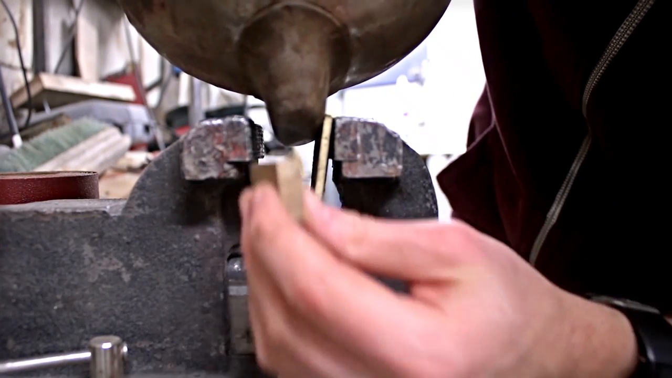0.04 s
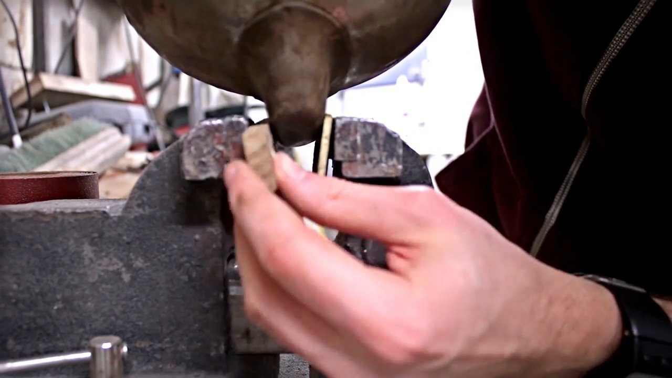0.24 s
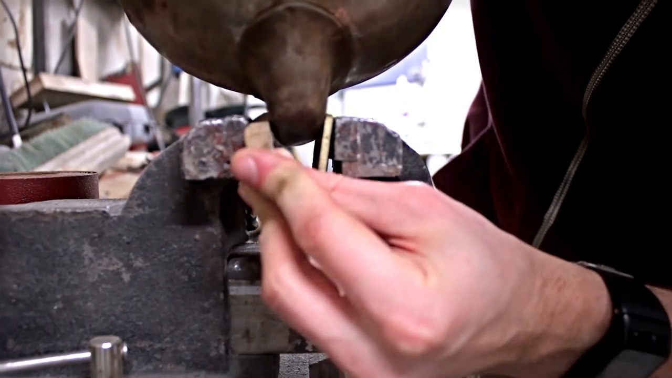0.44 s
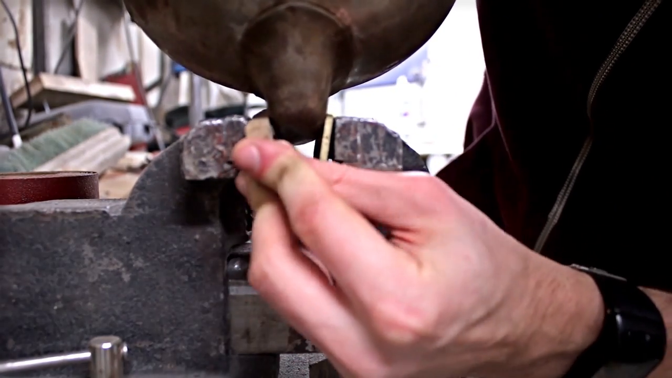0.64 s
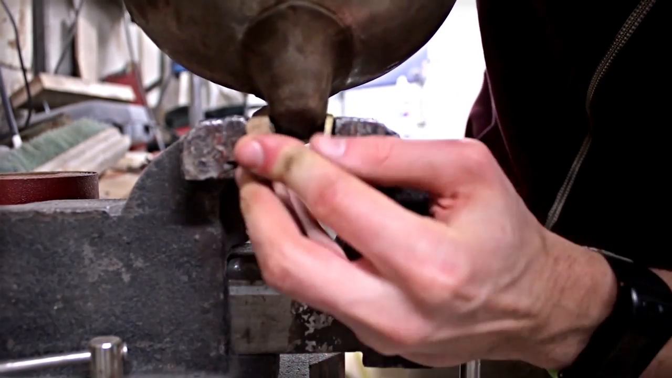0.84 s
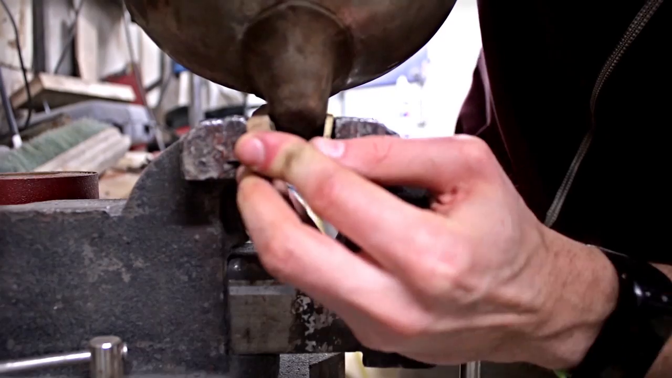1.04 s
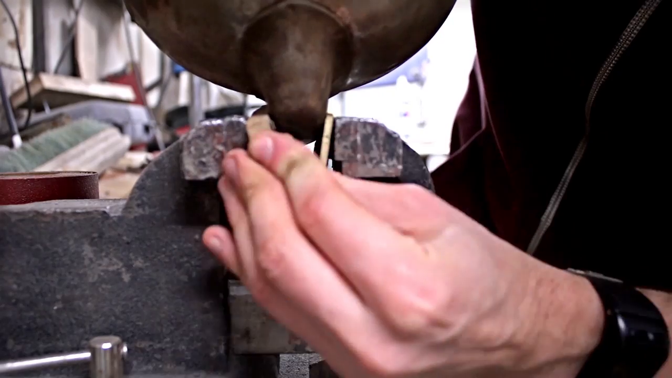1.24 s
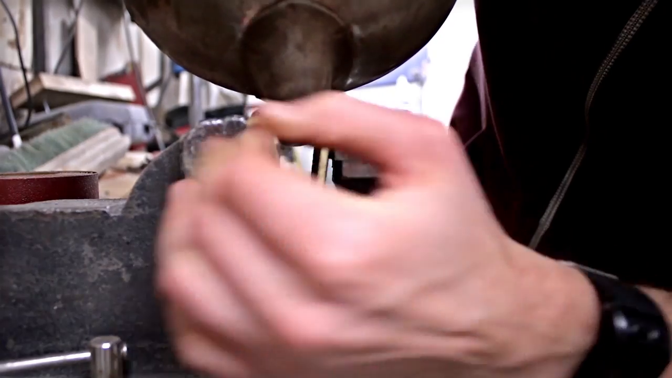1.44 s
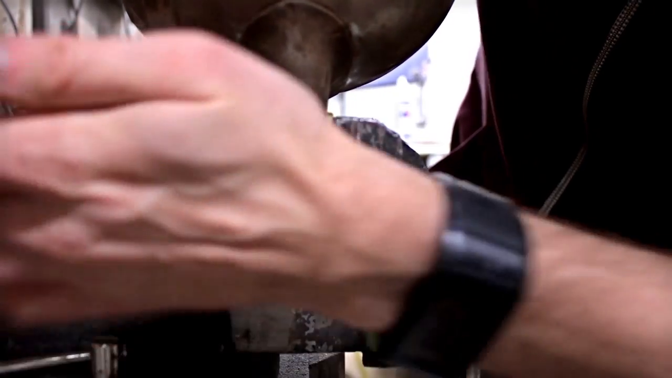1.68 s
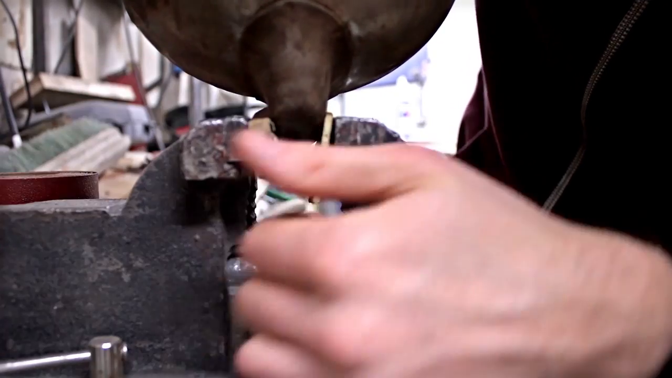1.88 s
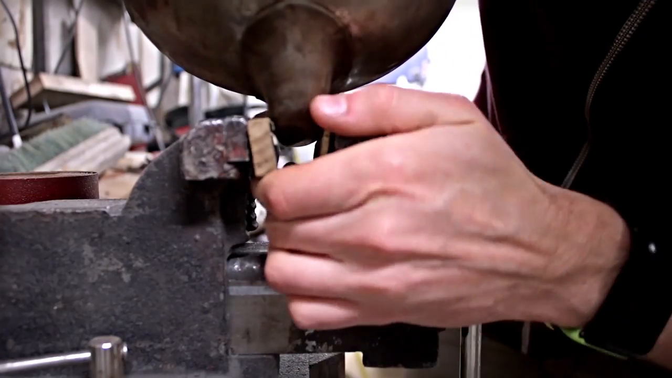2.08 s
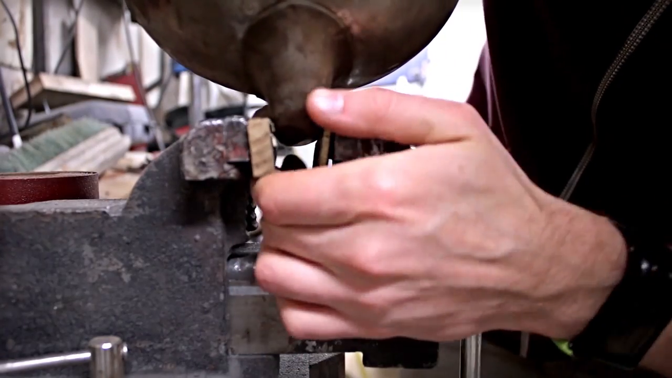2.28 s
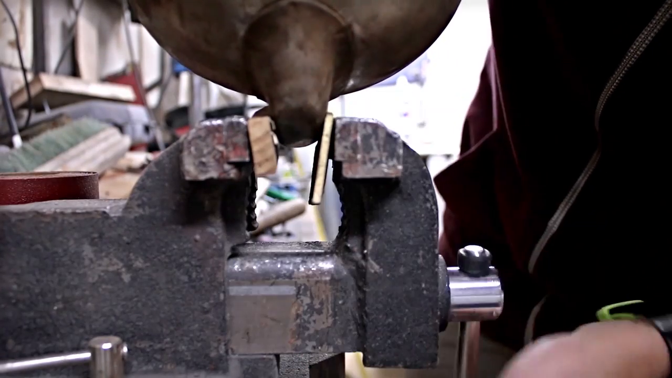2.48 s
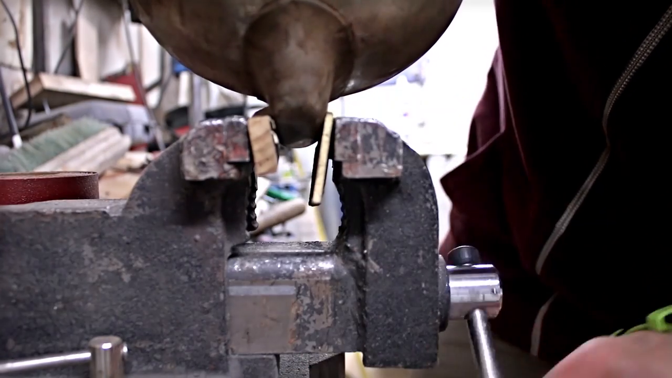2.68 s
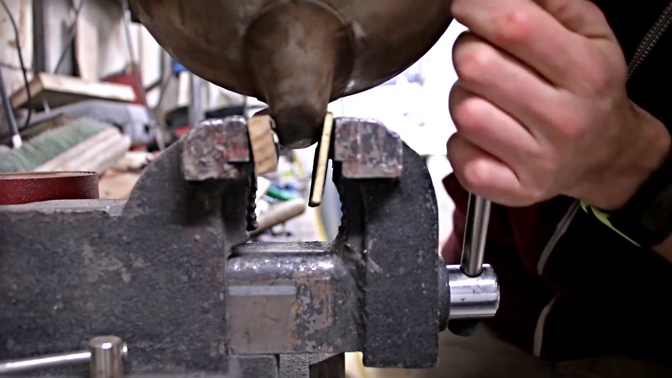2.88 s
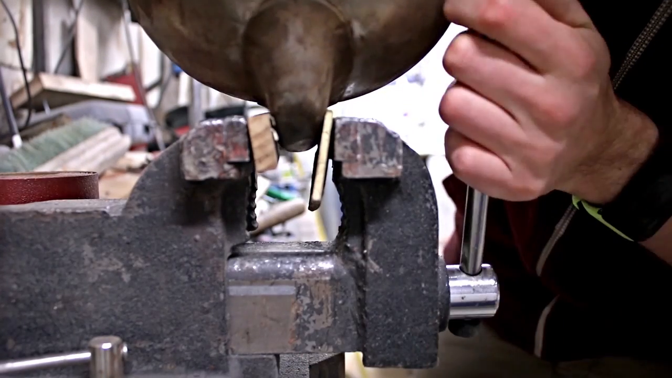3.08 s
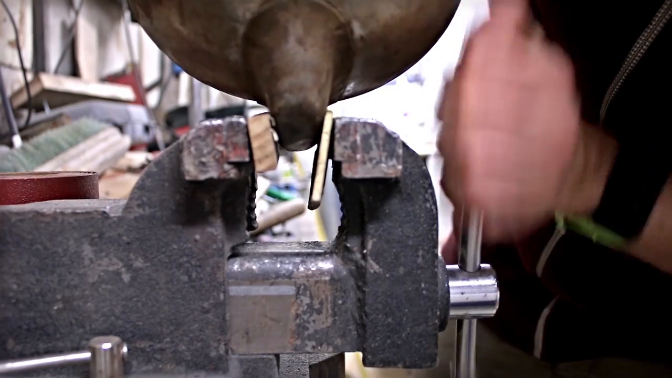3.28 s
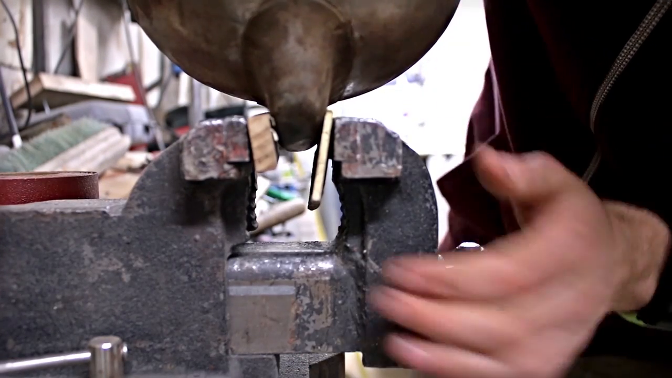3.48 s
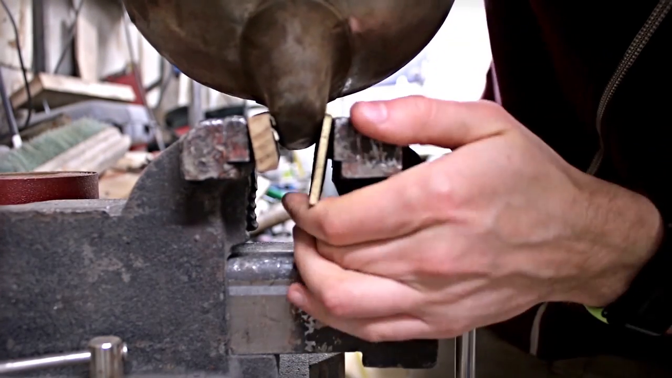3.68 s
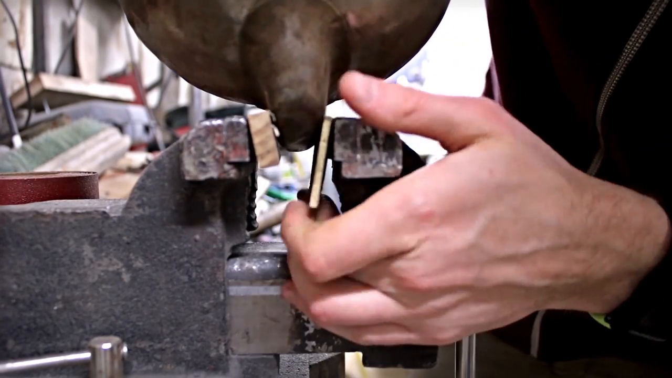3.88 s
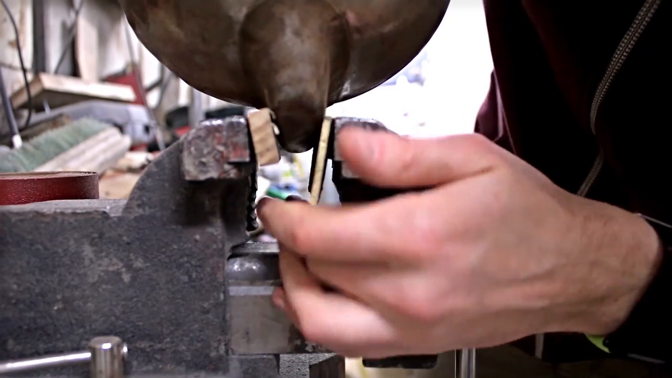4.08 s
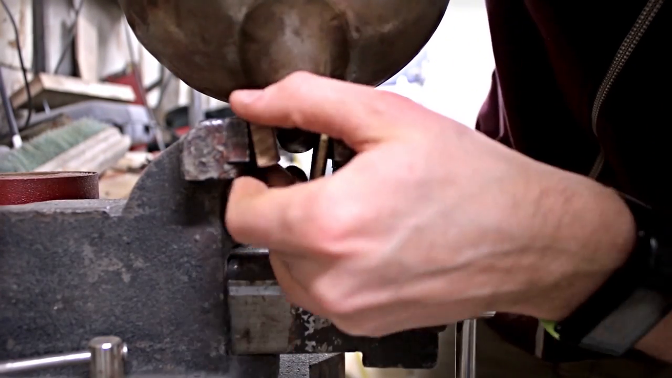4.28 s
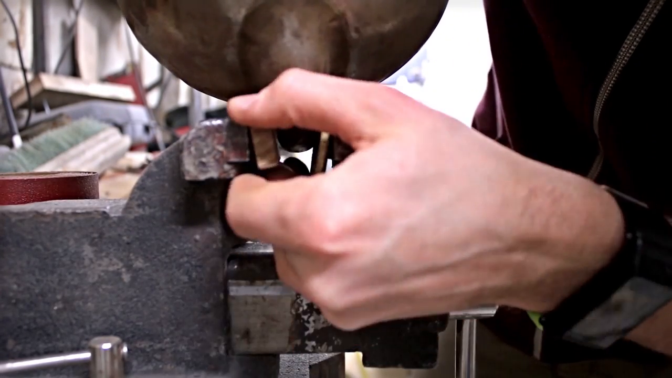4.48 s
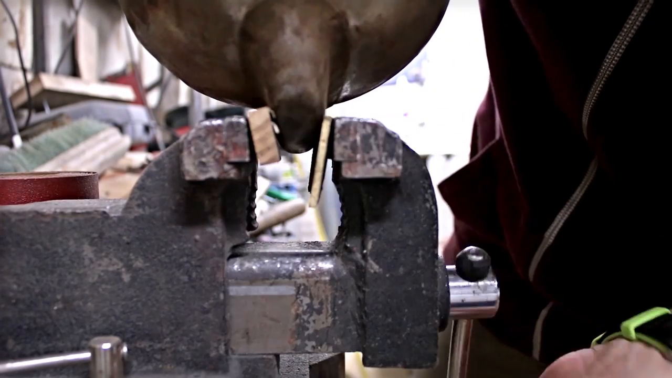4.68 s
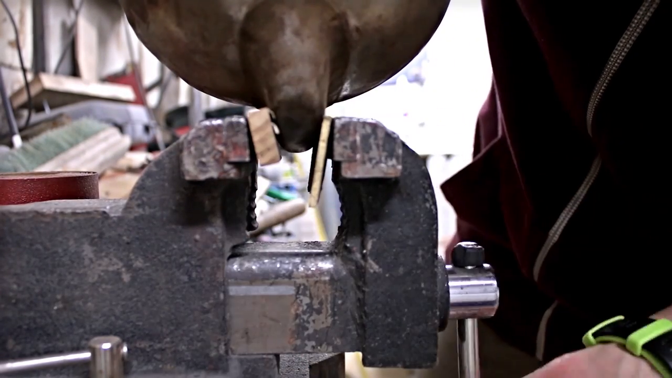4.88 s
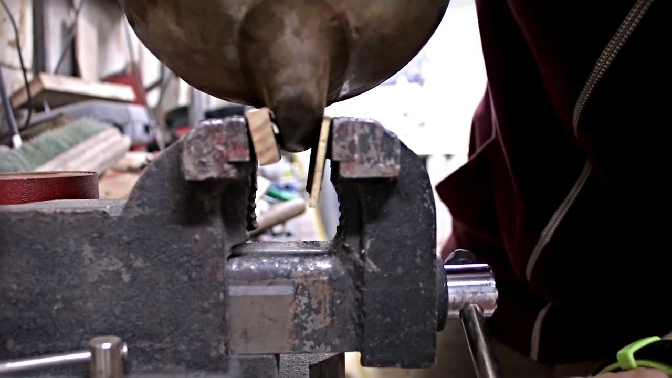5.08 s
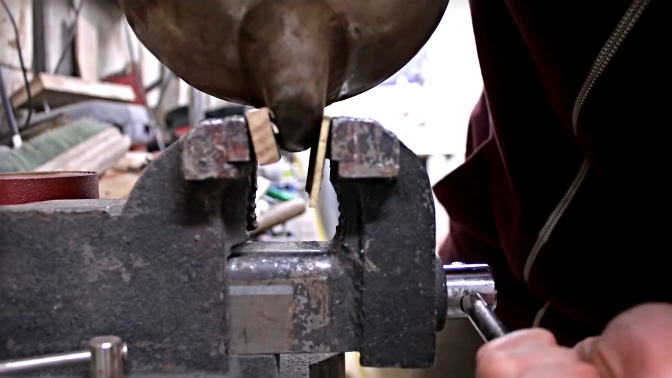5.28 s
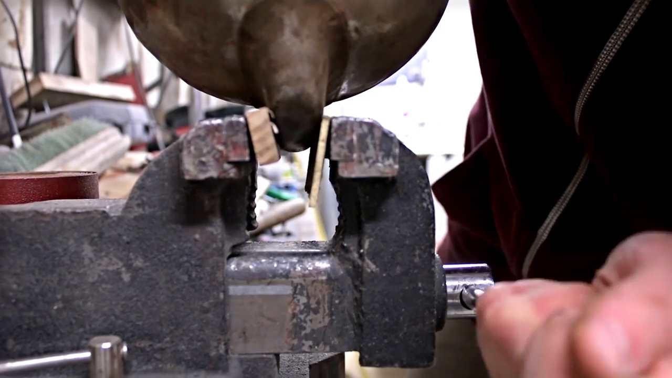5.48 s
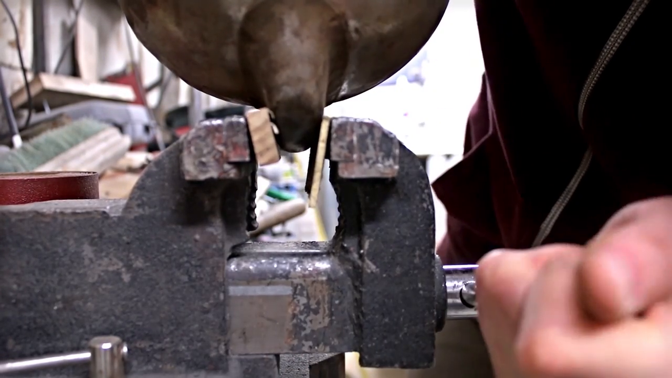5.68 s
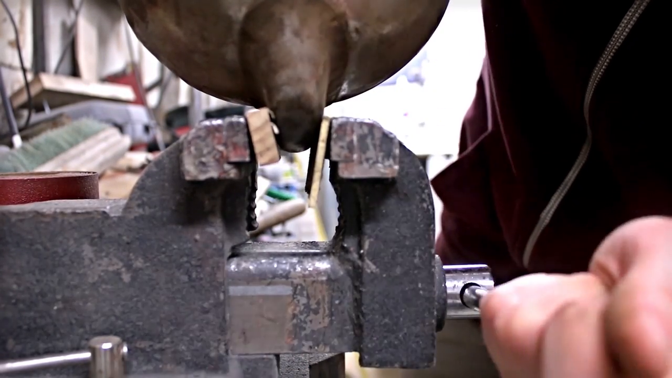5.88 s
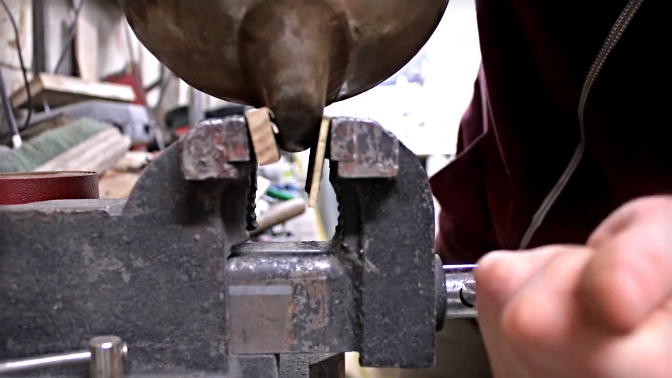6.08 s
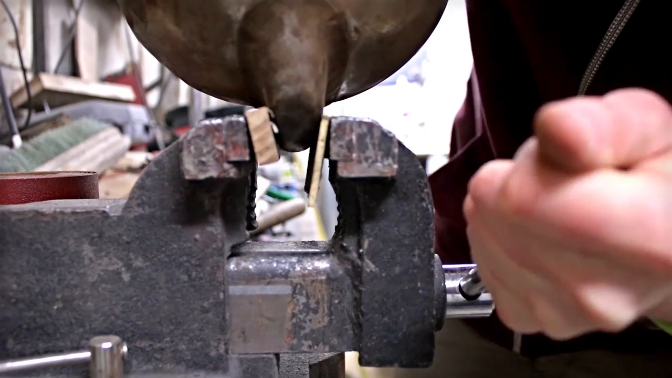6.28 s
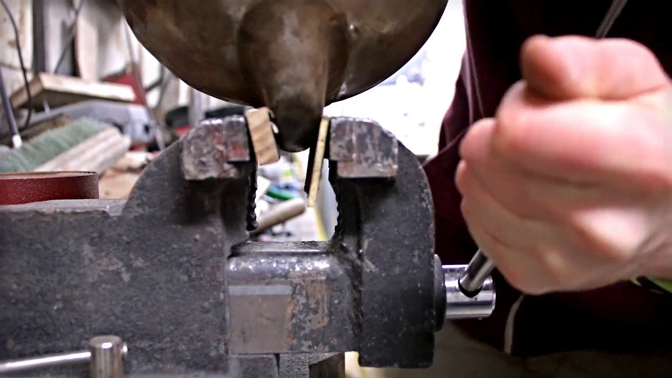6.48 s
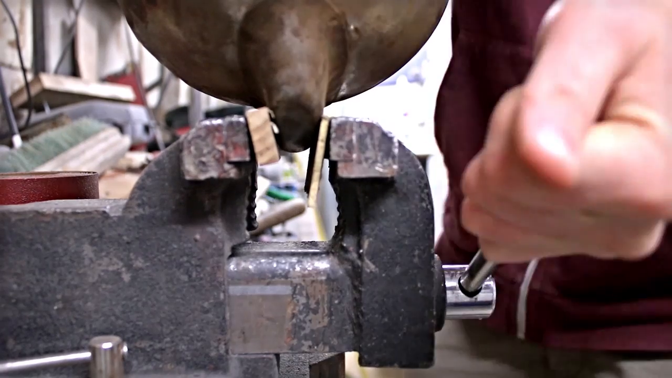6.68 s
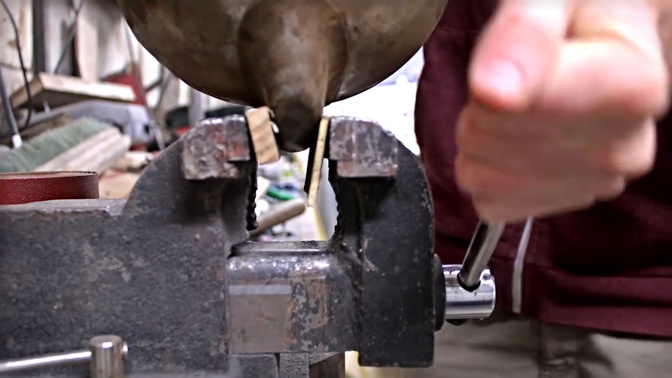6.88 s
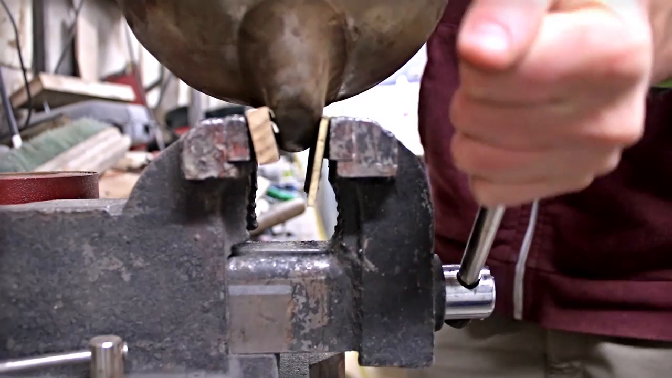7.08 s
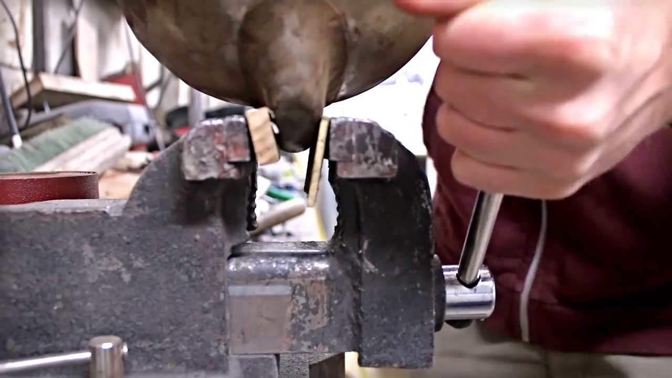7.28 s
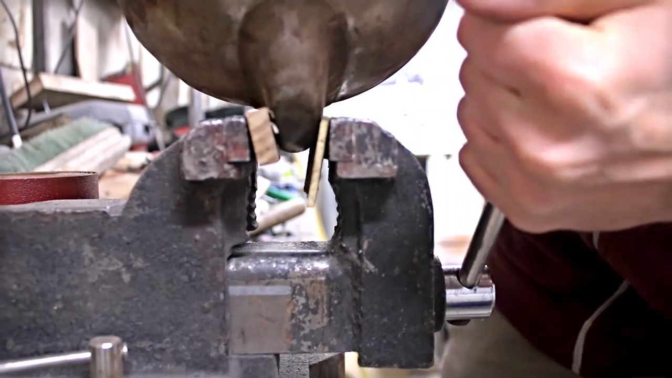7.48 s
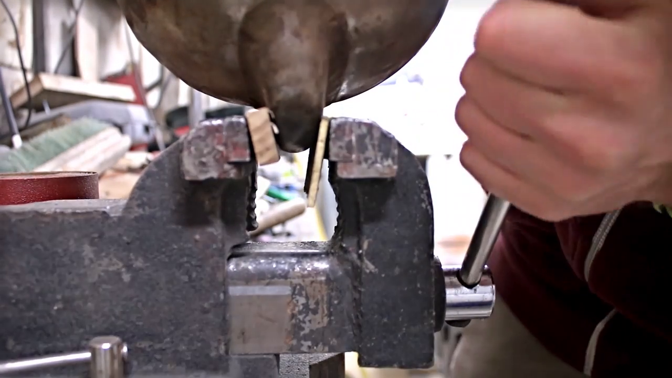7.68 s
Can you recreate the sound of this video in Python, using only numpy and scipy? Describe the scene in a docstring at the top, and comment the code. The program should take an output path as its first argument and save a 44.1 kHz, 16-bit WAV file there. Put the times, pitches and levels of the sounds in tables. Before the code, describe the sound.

Close workshop handling: light clinks, three quick heavy thuds on steel, loose bar rattles and a sharp clack, then creaky stuttering vise tightening.

```python
"""In a small, dry workshop a strip of wood and a metal shim are set in a steel bench vise, which is then tightened.
The shim clinks, three knocks shake the bench, and the handle bar slides and clacks in the spindle: filtered noise
bursts with decaying modes. Under each push the screw sticks and slips in a quick series of grinding noises.
The tighter the jaws, the more of a late jolt goes into the bench. Fingers and sleeves rub in between."""
import sys
import numpy as np
from scipy import signal
from scipy.fft import rfft, irfft
from scipy.io import wavfile

SR = 44100
rng = np.random.default_rng(int(sys.argv[2]) if len(sys.argv) > 2 else 0)


def master(y):
    """Save y as 16-bit WAV."""
    cut = np.clip(np.atleast_2d(y).T, -1, 1)
    pcm = np.round(cut * 32767)  # scale
    wavfile.write(sys.argv[1], SR, pcm.astype(np.int16))


N = 341334
T = np.arange(SR // 3) / SR  # time axis of one blow, in s
BLOW_S = 0.015  # stretch over which the bands of a blow or tick are levelled
GRIP_FROM_S = 5.31  # the jaws begin to bite


# Modes of the jaws: nominal pitch_hz, energy_db (against the contact click, before ring_db), t60_s
JAW_MODES = [(1360, 3.5, 0.018), (1445, 2.5, 0.011), (6240, -7.5, 0.011), (7260, 4, 0.01)]
# Knocks on the jaws: start_s, strength_db (before level_db), then against the blow: upper_middle_db, treble_db;
# last, rattle_db (added to chatter_db)
JAW_BLOWS = [(1.6521, -18, -25.5, -13.5, -12), (1.7398, -19.5, -11, -13.5, -7.5),
             (1.8244, -20, -7.5, -14, -7)]


def jaw_knocks():
    """Impact excitation of a heavy body: short modes and much energy passed to the bench."""
    return blows(JAW_BLOWS, JAW_MODES, contact_t60=0.017, chatter_db=8.5, ring_db=1.5, crisp_db=-20,
                 bass_db=-11.5, bench_db=3.5, bench_hz=55.4, level_db=-2)


# Modes of the handle bar: nominal pitch_hz, energy_db (against the contact click, before ring_db), t60_s
BAR_MODES = [(370, -1, 0.081), (969, 7, 0.062), (1480, -0.5, 0.021), (1820, -24, 0.035), (3640, -11, 0.032),
             (6690, 2, 0.024), (9300, -24, 0.012), (11600, -10, 0.027), (12960, 5, 0.029)]
# Clacks of the bar: start_s, strength_db (before level_db), then against the blow: upper_middle_db, treble_db;
# last, rattle_db (added to chatter_db)
BAR_BLOWS = [(2.6505, -45, -4, -2, 2), (2.698, -45, 0, 3, 2), (2.7268, -37, 2.5, 6.5, -5.5),
             (2.8118, -27, -1.5, -29, 18), (2.8187, -44, -2, 12.5, -11), (2.9085, -44.5, 12, 0, -5),
             (2.922, -36, -1.5, -10.5, 7), (3.387, -38, -4, -12, 7), (3.3968, -22, -8, -2, 4),
             (3.4125, -23, -4, -10, -1), (3.4772, -29.5, -11, 8, 6), (3.4828, -15, -10, -40, -1),
             (3.5565, -37.5, -10.5, -10, -4)]


def bar_clacks():
    """Modal ringing of a struck bar: each clack excites a set of inharmonic modes."""
    return blows(BAR_BLOWS, BAR_MODES, contact_t60=0.013, chatter_db=8, ring_db=0, crisp_db=-23,
                 bass_db=-9.5, bench_db=-7, bench_hz=140, level_db=-1)


# Resonances of the sliding bar: nominal pitch_hz, width_hz, gain_db
BAR_PEAKS = [(363, 240, 22.4), (770, 34, 34.4), (1000, 100, 32), (1290, 73, 28.4), (1884, 220, 29.6),
             (3450, 140, 13), (6660, 290, 5.2), (8950, 3900, 13)]
# Strokes of the bar: start_s, end_s, level_db (before level_db of the layer), treble_db (against the stroke's level)
BAR_SCRAPES = [(2.587, 2.625, -38.5, -40), (2.689, 2.71, -40, -19), (2.762, 2.805, -33, -50),
               (2.82, 2.95, -39.5, -43), (3.372, 3.4, -34.5, -11), (3.457, 3.477, -29.5, -7),
               (4.765, 4.773, -36, -30), (4.818, 4.85, -36.5, -27), (4.885, 4.925, -40, -16),
               (7.386, 7.425, -44, -16)]


def bar_scrapes():
    """Sliding friction: the roughness of the contact excites the resonances of the bar."""
    return slides(BAR_SCRAPES, BAR_PEAKS, grain_db=2.5, taper=0.19, soft_hz=6000, wander=0.0095,
                  level_db=-2, gather_db=-3)


# Modes of the spindle: nominal pitch_hz, energy_db (against the contact click, before ring_db), t60_s
SPINDLE_MODES = [(349, 12.5, 0.066), (1022, -2, 0.071), (1966, 13, 0.038), (2115, 14.5, 0.04),
                 (3770, 7, 0.043), (4157, 14.5, 0.019), (5190, 4, 0.063), (7300, 13, 0.0092),
                 (8060, 3.5, 0.097), (11430, 17, 0.019)]
# Blows on the spindle: start_s, strength_db (before level_db), then against the blow: upper_middle_db, treble_db;
# last, rattle_db (added to chatter_db)
SPINDLE_BLOWS = [(4.7726, -30, 3.5, 1.5, 12), (4.824, -39, 2, -8, 24), (4.9283, -50, -1, 4, 8),
                 (5.3638, -42, 2, -3, 11), (5.3917, -42.5, -2, -10, -4), (5.9435, -45, -16, -26, 1),
                 (6.101, -52, -4, -37, -6), (6.1098, -22.5, -11.5, -8.5, -2.5),
                 (6.4765, -43.5, -3.5, -25, -3), (7.389, -41.5, -12, -22, 18), (7.3995, -38.5, -5, -16, 13),
                 (7.4524, -41, 11, 0.5, 3.5)]


def spindle_blows():
    """Load-dependent coupling: as the jaws tighten, more of each blow on the spindle enters the bench."""
    return blows(SPINDLE_BLOWS, SPINDLE_MODES, contact_t60=0.0047, chatter_db=16, ring_db=-0.5, crisp_db=-29,
                 bass_db=-25, bench_db=-4.5, bench_hz=110, level_db=0.5, load_db_per_s=12.5)


# Resonances of the screw: nominal pitch_hz, width_hz, gain_db
SCREW_PEAKS = [(327, 58, 29), (1580, 490, 22), (1826, 170, 29.5), (3730, 90, 20), (9300, 300, 20.5),
               (10900, 1700, 32)]
# Smooth turns before the screw bites: start_s, end_s, level_db (before level_db of the layer), treble_db (against it)
FREE_TURNS = [(5.075, 5.25, -52.5, -16.5)]
# Pushes on the handle: start_s, end_s, slips_per_s, level_db (before level_db of the layer)
PUSHES = [(5.273, 5.515, 19.9, -51), (5.539, 5.712, 17, -50.5), (6.239, 6.37, 23, -50.5),
          (6.406, 6.532, 24, -50.5), (6.838, 7.03, 23, -51.5), (7.185, 7.236, 19.4, -45)]
SLIP_S = 0.025  # from the start of a slip to the nudge of its stop
SLIP_JITTER_S, SLIP_SCATTER_DB = 0.002, 0.5  # standard deviations of the rhythm and the strength
SLIP_TREBLE_DB = -15  # treble against the body of a slip


def screw(bench_db, load_db_per_s, slack_pitch, taut_pitch):
    """Stick-slip friction: each slip grinds, higher than in free turning, and each stop nudges the bench."""
    slips, out = [], np.zeros(N)
    for start, end, per_s, push_db in PUSHES:
        for beat in start + np.arange(round((end - start) * per_s)) / per_s:
            s = beat + SLIP_JITTER_S * rng.standard_normal()
            db = push_db + SLIP_SCATTER_DB * rng.standard_normal()
            slips.append((s, s + SLIP_S, db, SLIP_TREBLE_DB))
            nudge_db = db + bench_db + load_db(s, load_db_per_s)
            add(out, s + SLIP_S, thump(nudge_db, lowest_hz=88.5))
    for strokes, pitch in (FREE_TURNS, slack_pitch), (slips, taut_pitch):
        peaks = [(hz * pitch, width, db) for hz, width, db in SCREW_PEAKS]
        out += slides(strokes, peaks, grain_db=2.5, taper=0.26, soft_hz=14000, wander=0.044,
                      level_db=1.5, gather_db=2)
    return out


# Modes of the metal shim: nominal pitch_hz, energy_db (against the contact click, before ring_db), t60_s
SHIM_MODES = [(1480, 14, 0.01), (2190, -4, 0.024), (6450, 3, 0.037), (7380, 1, 0.067), (14770, -21, 0.091)]
# Clinks of the shim: start_s, strength_db (before level_db), then against the blow: upper_middle_db, treble_db;
# last, rattle_db (added to chatter_db)
SHIM_BLOWS = [(0.1217, -39, 2, -3, -22), (0.2068, -42, 7.5, 0, 21), (0.2148, -26, -1.5, -1, -15),
              (0.2604, -37.5, -2.5, -4.5, 0)]


def shim_clinks():
    """Modal ringing of a light metal plate: a very brief contact and little bass."""
    return blows(SHIM_BLOWS, SHIM_MODES, contact_t60=0.0014, chatter_db=6, ring_db=3, crisp_db=-22,
                 bass_db=-33, bench_db=8, bench_hz=100, level_db=-2.5)


# Modes of the wooden strip: nominal pitch_hz, energy_db (against the contact click, before ring_db), t60_s
WOOD_MODES = [(1440, 0, 0.013), (2735, 11, 0.0087), (2950, 14, 0.045), (6820, 11.7, 0.0046)]
# Taps of the wood: start_s, strength_db (before level_db), then against the blow: upper_middle_db, treble_db;
# last, rattle_db (added to chatter_db)
WOOD_BLOWS = [(0.0195, -47, 4.5, -15, 17), (0.148, -43, 12, 12.5, 16), (0.635, -53, -3, -7, 24),
              (2.077, -44, 1.5, -24, 7), (2.0895, -47, 3, 0.5, 15), (3.9765, -42, -2.5, 1, 0),
              (4.1326, -49.5, -0.5, -16, 11)]


def wood_taps():
    """High internal damping: the modes of the wood die within a few hundredths of a second."""
    return blows(WOOD_BLOWS, WOOD_MODES, contact_t60=0.02, chatter_db=10, ring_db=-5.5, crisp_db=-4,
                 bass_db=-21.5, bench_db=6, bench_hz=100, level_db=2)


# Band edges shared by ticks and slides, body then treble: edge_hz
SLIDE_EDGES_HZ = [160, 6000, 16000]
# Dry little ticks: start_s, body_db, treble_db (both before level_db)
TICKS = [(0.077, -53, -72), (0.6888, -53, -44), (2.538, -52, -42), (4.11, -58, -55), (6.769, -37, -37)]


def ticks(t60, level_db):
    """Impulsive contact without resonance: small dry snaps of differenced noise."""
    out = np.zeros(N)
    for s, *bands_db in TICKS:
        snap = np.diff(rng.standard_normal(len(T)) * decay(t60), prepend=0)
        add(out, s, voice(snap, SLIDE_EDGES_HZ, bands_db, size=int(BLOW_S * SR)))
    return amp(level_db) * out


# Resonances of the rubbed and fidgeting packing: nominal pitch_hz, width_hz, gain_db
SHIM_PEAKS = [(1160, 65, 8.2), (1366, 370, 23.6), (2820, 180, 4.1), (7060, 550, 9.1), (12400, 450, 7.5),
              (11900, 1200, 7.7)]
# Strokes of the fingers: start_s, end_s, level_db (before level_db of the layer), treble_db (against the stroke's level)
FINGER_SLIDES = [(0.725, 0.81, -46.5, -10), (1.165, 1.195, -49, -12), (1.298, 1.365, -50.5, -9),
                 (1.449, 1.463, -54, -28), (2.048, 2.075, -51.5, -6), (2.365, 2.385, -48, -12),
                 (2.41, 2.432, -47.5, -6), (4.642, 4.672, -48, -3.5)]


def finger_slides():
    """Skin friction: granular noise excites the packing, whose resonances shift with the spot."""
    return slides(FINGER_SLIDES, SHIM_PEAKS, grain_db=4.5, taper=0.49, soft_hz=12400, wander=0.18, level_db=-1)


# Fingers holding the packing: start_s, end_s
HOLDING = [(.3, 1.6), (1.98, 2.45), (3.65, 4.3)]


def fidget(spans, per_s, level_db):
    """Random point contacts: while the fingers hold it, the packing shifts against the jaws in tiny touches."""
    t = np.arange(N) / SR
    holding = sum((t > start) & (t < end) for start, end in spans)
    touches = holding * (rng.random(N) < per_s / SR) * rng.uniform(0.3, 1, N)
    scuffs = signal.fftconvolve(touches, decay(0.038))[:N] * rng.standard_normal(N)
    return amp(level_db) * resonate(scuffs, SHIM_PEAKS)


# Resonances of the sleeve rub: nominal pitch_hz, width_hz, gain_db
SLEEVE_PEAKS = [(835, 190, 15.7), (1180, 750, 7.5), (1800, 200, 6.9), (3560, 77, 3.2)]
# Moves of the arms: start_s, end_s, level_db (before level_db of the layer), treble_db (against the move's level)
ARM_MOVES = [(0.01, 0.33, -49, -12), (0.66, 0.92, -52.5, -4.5), (2.13, 2.25, -47.5, -8),
             (2.55, 3.15, -48.5, -11.5), (3.86, 4.5, -52.5, -9.5), (4.83, 5.06, -44, -9.5),
             (6.66, 6.8, -50.5, -4.5), (7.315, 7.47, -47.5, -2)]


def sleeve_rubs():
    """Cloth friction: many uneven contacts give a soft, broad noise."""
    return slides(ARM_MOVES, SLEEVE_PEAKS, grain_db=4, taper=0.21, soft_hz=12700, wander=0.06,
                  level_db=-5, gather_db=0.5)


# Band edges of a blow, from bass to treble: edge_hz
BLOW_EDGES_HZ = [150, 600, 2400, 6000, 16000]
# Chatter of the casting: pitch_hz, t60_s
CHATTER = [(300, 0.14), (1200, 0.054), (3500, 0.068), (14000, 0.013)]
# Broad resonances stirred by the chatter: pitch_hz, width_hz, gain_db
CASTING_PEAKS = [(370, 120, 16), (532, 810, 12), (1130, 70, 23.5), (1350, 390, 27.5), (1705, 73, 24.5),
                 (3380, 790, 10.5), (7700, 1000, 8), (9200, 4200, 18)]
# A harder blow keeps the parts pressed together: dB of ring lost per dB of strength above medium
MEDIUM_BLOW_DB, RING_DAMPING = -39.5, 0.37


def blows(rows, modes, contact_t60, chatter_db, ring_db, crisp_db, bass_db, bench_db, bench_hz, level_db,
          load_db_per_s=0):
    """Impact as a sum of parts: a contact click, dense casting chatter, the struck part's modes, a bench thump."""
    out = np.zeros(N)
    for s, strength_db, edge_db, click_db, rattle_db in rows:
        contact = rng.standard_normal(len(T)) * decay(contact_t60)
        chatter = resonate(dying_noise(CHATTER), CASTING_PEAKS)
        blow = contact / np.linalg.norm(contact)
        blow += amp(chatter_db + rattle_db) * chatter / np.linalg.norm(chatter)
        blow += amp(ring_db - RING_DAMPING * (strength_db - MEDIUM_BLOW_DB)) * ring(modes)
        # lift the highest treble, most for the wood taps
        blow += amp(crisp_db) * np.convolve(blow, [-1, 2, -1], "same")
        weight_db = bass_db + load_db(s, load_db_per_s)
        blow = voice(blow, BLOW_EDGES_HZ, [weight_db, 0, edge_db, click_db], size=int(BLOW_S * SR))
        add(out, s, amp(strength_db) * (blow + thump(weight_db + bench_db, bench_hz)))
    return amp(level_db) * out


def ring(modes, detune=0.012):
    """Modal synthesis: dying sines; grip and spot struck vary their pitch and share from blow to blow."""
    out = np.zeros(len(T))
    for hz, db, t60 in modes:
        pitch_hz = hz * (1 + detune * rng.uniform(-1.1, 1))
        wave = np.sin(2 * np.pi * pitch_hz * T) * decay(t60)
        out += amp(db + rng.uniform(-3, 3)) * wave / np.linalg.norm(wave)
    return out


# Modes of the bench: nominal pitch_hz, energy_db (before the low cut and damping), t60_s (before the damping)
BENCH_MODES = [(56, 3, 0.72), (101.7, 4, 0.1), (141.5, 2.5, 0.51), (222, -6, 0.17), (429.5, -3.5, 0.14)]


def thump(db, lowest_hz, held_t60=0.5):
    """Structure-borne response: the bench rocks, damped by hands; a light part hardly stirs its lowest modes."""
    low_cut = signal.butter(2, lowest_hz, "high", fs=SR, output="sos")
    rocking = signal.sosfilt(low_cut, ring(BENCH_MODES, detune=0.1))
    return -amp(db) * np.sqrt(BLOW_S * SR) * rocking * decay(held_t60)


def load_db(s, db_per_s):
    """Contact stiffening: how much more of a jolt reaches the bench as the jaws tighten."""
    return db_per_s * max(s - GRIP_FROM_S, 0)


def slides(rows, peaks, grain_db, taper, soft_hz, wander, level_db, gather_db=0):
    """Friction excitation: each stroke swells or fades and stirs resonances, which shift with the spot."""
    out = np.zeros(N)
    soften = signal.butter(1, soft_hz, fs=SR)
    for start, end, db, treble_db in rows:
        size = int((end - start + 0.0053) * SR)
        speed = amp(np.linspace(-gather_db, 0, size)) * signal.windows.tukey(size, taper)
        rub = signal.lfilter(*soften, grit(size, grain_db, grain_s=0.001) * speed)
        shift = 1 + wander * rng.uniform(-1.2, 1)
        shifted_peaks = [(hz * shift, width, peak_db) for hz, width, peak_db in peaks]
        rub = resonate(np.pad(rub, (0, SR // 20)), shifted_peaks)  # room to ring on
        add(out, start - 0.004, voice(rub, SLIDE_EDGES_HZ, [db, db + treble_db], size=size))
    return amp(level_db) * out


def grit(size, grain_db, grain_s):
    """Asperity contact: friction noise from tiny contacts of uneven strength."""
    t = np.arange(size) / SR
    knots = np.arange(0, t[-1] + grain_s, grain_s)
    strengths = np.clip(rng.standard_normal(len(knots)), -2, 2)
    return rng.standard_normal(size) * amp(grain_db * np.interp(t, knots, strengths))


def resonate(x, peaks):
    """Resonance: adds the peaks of a body to what excites it."""
    return x + sum(amp(db) * signal.lfilter(*signal.iirpeak(hz, hz / width, SR), x) for hz, width, db in peaks)


def dying_noise(t60s):
    """Frequency-dependent damping: a noise burst in which each frequency dies at its own speed."""
    hz, t, z = signal.stft(rng.standard_normal(len(T)), SR, nperseg=128)
    fade = np.exp(-np.log(1000) * t / read(t60s, hz)[:, None])
    return signal.istft(z * fade, SR, nperseg=128)[1][:len(T)]


def decay(t60):
    """Exponential decay: an envelope that falls 60 dB in t60 seconds."""
    return np.exp(-np.log(1000) * T / t60)


def voice(x, edges, levels_db, size):
    """Band equalization: sets the rms level of each band over the first size samples."""
    out = np.zeros(len(x))
    for low, high, db in zip(edges, edges[1:], levels_db):
        band = signal.sosfilt(signal.butter(4, (low, high), "band", fs=SR, output="sos"), x)
        out += amp(db) * band / np.sqrt(np.mean(band[:size] ** 2))
    return out


def shaped(x, spectrum):
    """Spectral shaping: weights a noise by frequency, at rms 1."""
    return unit(irfft(rfft(x) * amp(read(spectrum, np.fft.rfftfreq(N, 1 / SR))), N))


def read(points, hz):
    """Logarithmic frequency scale: a table's value, interpolated."""
    f, value = np.transpose(points)
    return np.interp(np.log(hz + 1), np.log(f), value)


def amp(db):
    """Level law: decibels to gain."""
    return 10 ** (np.asarray(db) / 20)


def unit(x):
    """Normalization: scales to rms 1."""
    return x / np.sqrt(np.mean(x ** 2) + 1e-20)


def add(mix, s, sound):
    """Superposition: lays a sound into the mix at time s."""
    part = mix[max(round(s * SR), 0):][:len(sound)]
    part += sound[:len(part)]


# Leans on the bench: start_s, end_s, level_db (of the full weight)
LEANS = [(.55, 2.15, -59), (5.15, 5.9, -56.5), (6.0, 7.55, -49.5)]
# Spectrum of the rumble: pitch_hz, density_db (per Hz, relative)
SWAY_COLOUR = [(22, -28), (33, -46), (45, 9.5), (58, -8.5), (74, -6), (100, -8), (140, -2), (200, -15.5),
               (350, -14), (1500, -51.5)]


def sway(rest_db, ease_s):
    """Low-frequency structural noise: the bench rumbles as someone leans; the weight comes and goes gradually."""
    t = np.arange(N) / SR
    weight = sum(amp(db) * np.clip(np.minimum(t - start, end - t) / ease_s, 0, 1) for start, end, db in LEANS)
    return np.hypot(amp(rest_db), weight) * shaped(rng.standard_normal(N), SWAY_COLOUR)


# Spectrum of the body of the rub: pitch_hz, density_db (per Hz, relative)
RUB_BODY = [(150, 3.5), (470, -3.5), (590, 3), (780, -0.5), (1250, -2), (1550, -5.5), (1800, -6),
            (2400, -7.5), (3600, -13), (6000, -44)]
# Spectrum of the hiss of the rub: pitch_hz, density_db (per Hz, relative)
RUB_HISS = [(1500, -10.5), (3500, 2.5), (4700, 1), (6500, -2), (8000, -2.5), (14300, -2), (16000, 1)]


def handling(body_db, hiss_db, grain_db):
    """Continuous friction noise: skin and cloth rub faintly all the time."""
    rub = amp(body_db) * shaped(grit(N, grain_db, grain_s=0.0019), RUB_BODY)
    return rub + amp(hiss_db) * shaped(grit(N, grain_db, grain_s=0.017), RUB_HISS)


# Reverberation of the workshop: pitch_hz, t60_s
ROOM = [(100, 0.51), (1500, 0.069), (16000, 0.18)]


def workshop(x):
    """Diffuse reverberation: a short noise tail; the bass lasts longest and the middle dies first."""
    tail = np.pad(dying_noise(ROOM), (int(0.006 * SR), 0))
    return signal.fftconvolve(x, tail / np.linalg.norm(tail))[:N]


def scene():
    """Superposition of all the work at the vise, very nearly mono."""
    vise = jaw_knocks() + bar_clacks() + bar_scrapes() + spindle_blows()
    vise += screw(bench_db=-4.5, load_db_per_s=4, slack_pitch=0.98, taut_pitch=1.047)
    vise += shim_clinks() + wood_taps()
    vise += ticks(t60=0.004, level_db=-3.5)
    vise += finger_slides()
    vise += fidget(HOLDING, per_s=20, level_db=-52)
    background = sway(rest_db=-60, ease_s=0.23) + handling(body_db=-55.5, hiss_db=-60, grain_db=2)
    mid = vise + amp(-16.5) * workshop(vise) + sleeve_rubs() + background
    # a faint, mostly treble noise makes left and right differ slightly
    side = workshop(amp(-45) * mid + amp(-30) * np.diff(mid, prepend=0))
    side += amp(-67) * shaped(rng.standard_normal(N), RUB_HISS)
    return np.array([mid + side, mid - side])


def record(dry):
    """Band limiting and soft saturation: a low cut, rounding of the loudest peaks, and a treble limit."""
    dry = signal.sosfilt(signal.butter(4, 34, "high", fs=SR, output="sos"), dry)
    dry = dry / (1 + (dry / 0.7) ** 6) ** (1 / 6)
    treble_limit = signal.firwin(301, 16000, window=("kaiser", 8), fs=SR)
    return signal.oaconvolve(dry, treble_limit[None], "same")


dry = scene()
out = record(dry)
master(out)
```